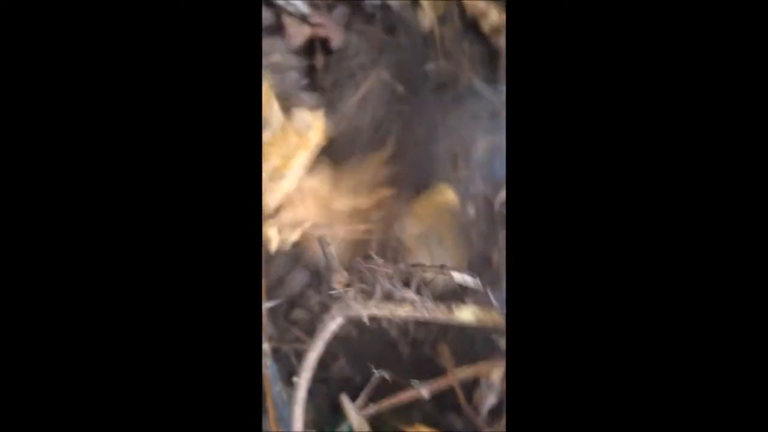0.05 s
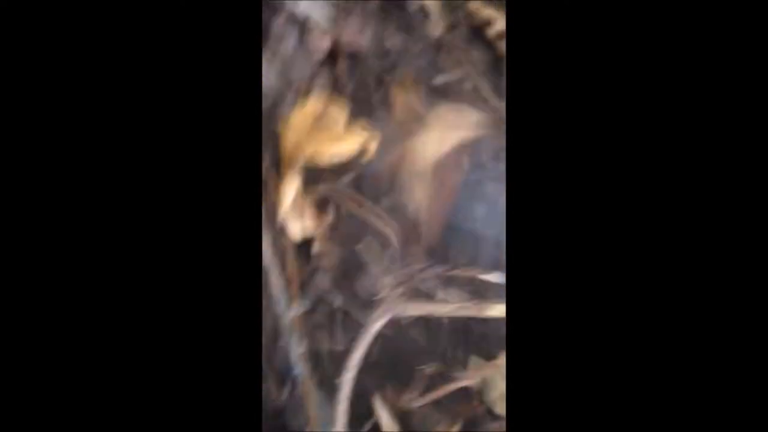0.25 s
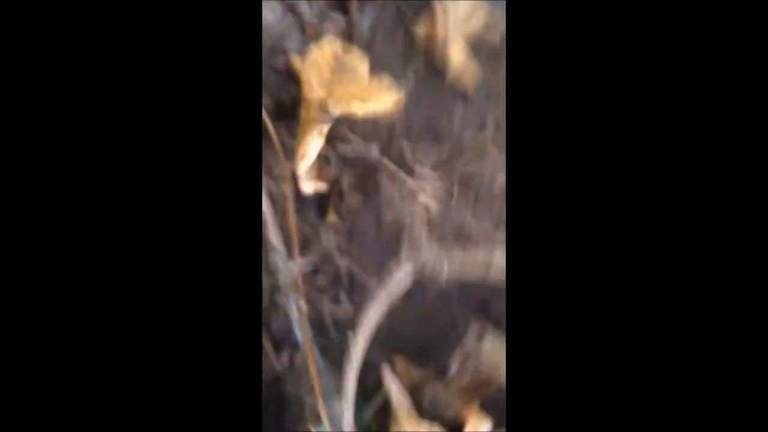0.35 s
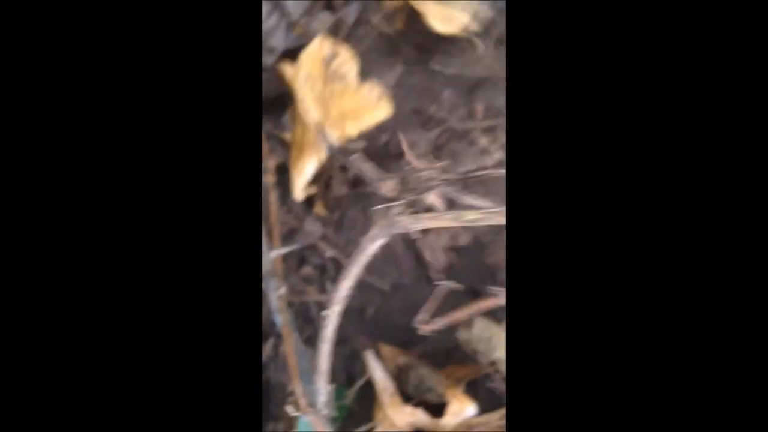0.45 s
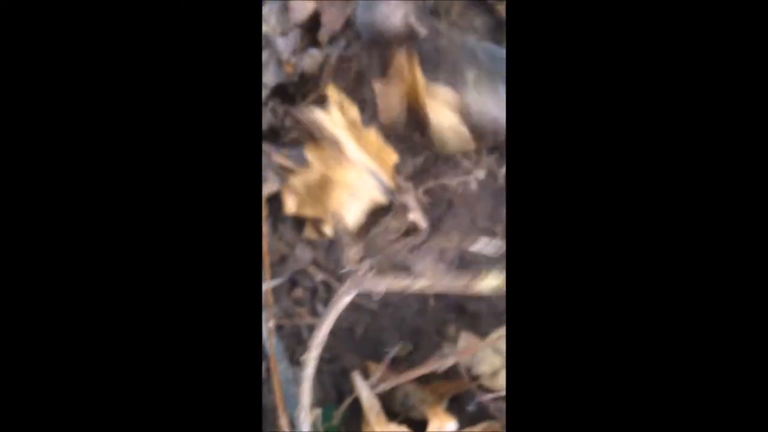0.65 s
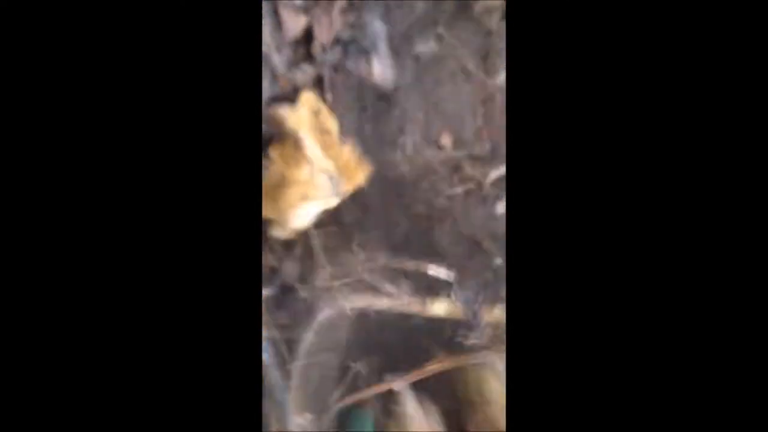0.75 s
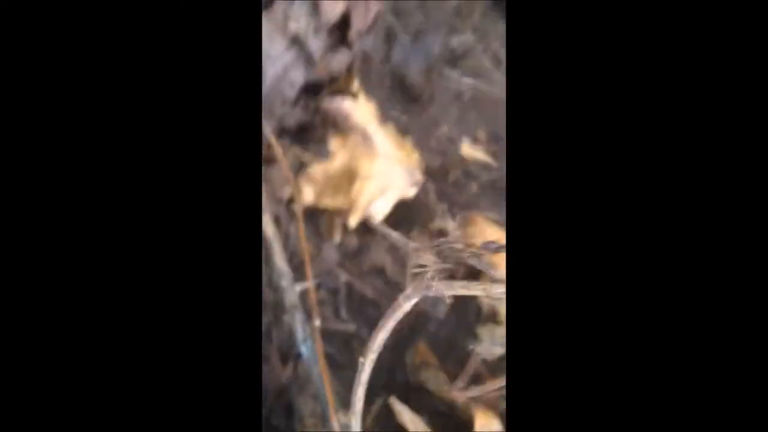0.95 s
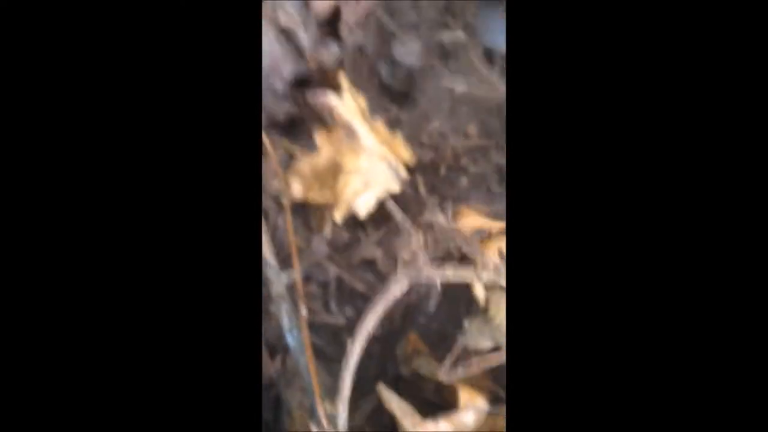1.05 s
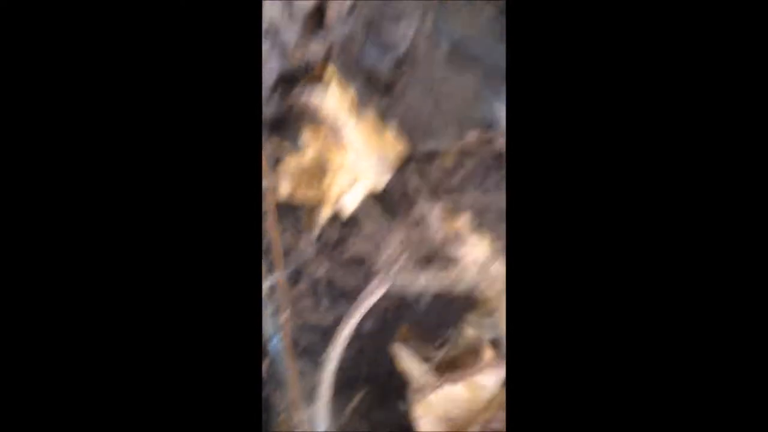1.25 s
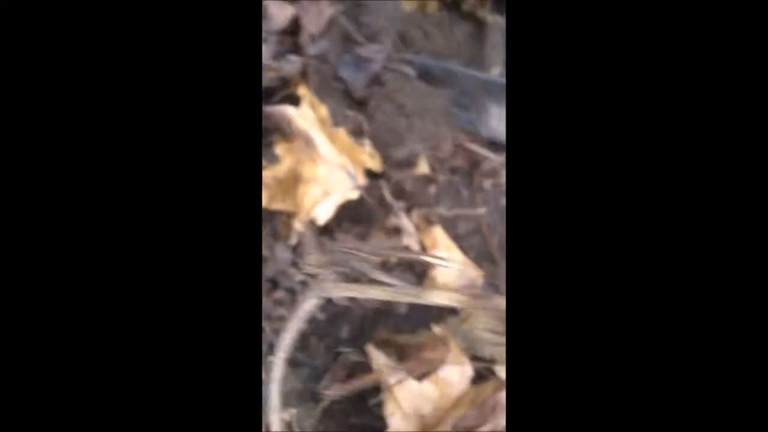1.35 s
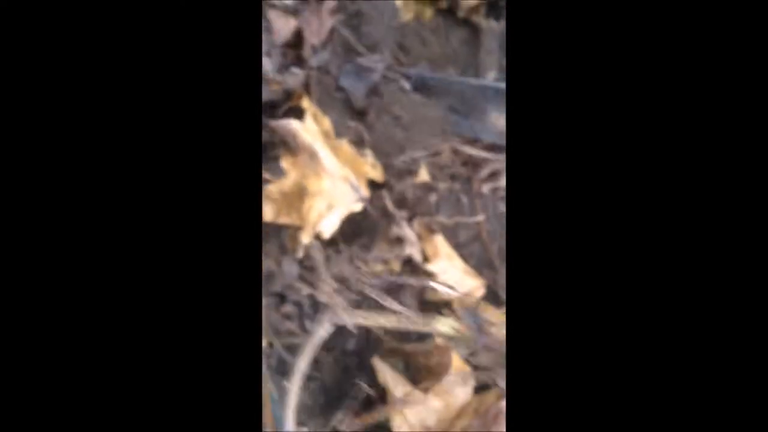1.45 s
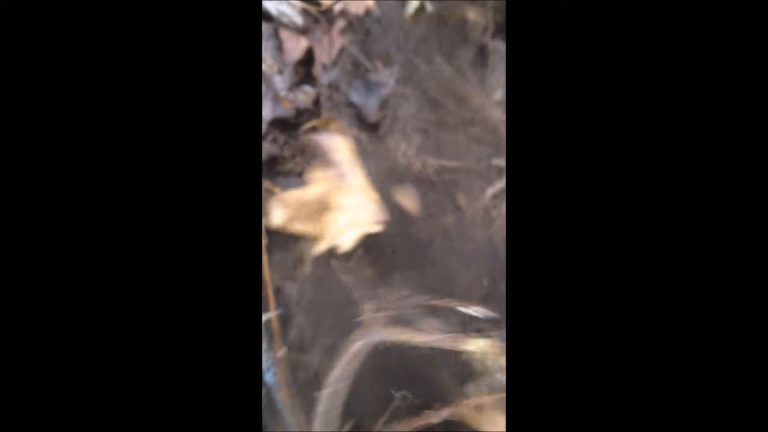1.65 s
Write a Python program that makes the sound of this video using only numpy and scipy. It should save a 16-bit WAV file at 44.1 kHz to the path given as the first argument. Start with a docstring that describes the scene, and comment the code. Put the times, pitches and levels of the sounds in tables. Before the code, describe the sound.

Digging in dry leaves: two bursts of sharp crackle, twig snaps and dull ground thuds

```python
"""Digging in leaf litter

A hand digging tool strikes leaf litter and rooty soil in short strokes, close to a small microphone.
Blows into the ground are damped low swings; twigs snap as a pulse with a dying burst of noise.
Leaves crackle and soil crunches as dense showers of tiny rings over noise.
A dull, lumpy low-mid rumble of sparse impulses comes and goes.
A low outdoor rumble and faint hiss, made of coloured noise, lie underneath."""
import sys
import numpy as np
from scipy import signal
from scipy.fft import rfft, irfft
from scipy.io import wavfile
from scipy.ndimage import uniform_filter1d

SR = 44100
rng = np.random.default_rng(int(sys.argv[2]) if len(sys.argv) > 2 else 0)


def pcm_store(signal):
    """Save signal as 16-bit PCM."""
    levels = np.round(np.clip(np.atleast_2d(signal), -1, 1) * 32767)
    wavfile.write(sys.argv[1], SR, levels.astype(np.int16).T)


N = 74970  # length in samples


def amp(db):
    """Decibels are logarithmic: 20 dB is a factor of ten in amplitude."""
    return 10 ** (np.asarray(db) / 20)


def evened(x):
    """Normalisation of power: the signal is brought to unit RMS."""
    return x / np.sqrt(np.mean(x ** 2) + 1e-20)


def add(mix, start_s, sound):
    """Superposition: a sound is summed into the mix at its start, cut at the end."""
    part = mix[round(start_s * SR):][:len(sound)]
    part += sound[:len(part)]


def coloured(x, points):
    """Spectral shaping: a gain over log frequency, 30 dB down an octave outside the table; unit RMS."""
    f, db = np.transpose(points)
    hz = np.fft.rfftfreq(N, 1 / SR) + 1  # 1 Hz up, so that the logarithm exists
    knots_hz = np.r_[f[0] / 2, f, f[-1] * 2]
    knots_db = np.r_[db[0] - 30, db, db[-1] - 30]
    gain_db = np.interp(np.log(hz), np.log(knots_hz), knots_db)
    return evened(irfft(rfft(x) * amp(gain_db), N))


def wander(samples):
    """Low-pass random process: noise averaged twice drifts slowly, at unit RMS."""
    once = uniform_filter1d(rng.standard_normal(N), samples)
    return evened(uniform_filter1d(once, samples))


def air():
    """Stationary coloured noise: low outdoor rumble and faint hiss, gently swelling."""
    # spectrum of the outdoor air: frequency_hz, relative_density_db (per Hz)
    air_spectrum = [(24, -100), (40, 2), (139, -1.5), (325, -21), (461, -22), (1190, -16), (1600, -21.5),
                    (1960, -55), (15500, -40)]
    level_db, swell_db = -58, 0.8
    swelling = amp(level_db + swell_db * wander(samples=1500))
    return swelling * coloured(rng.standard_normal(N), air_spectrum)


def low_mid_rumble():
    """Shot noise: sparse random impulses, band-shaped, make a dull, lumpy rumble that comes and goes."""
    # level of the low-mid rumble: time_s, level_db
    rumble_levels = [(.06, -65.5), (.1, -60), (.16, -64.5), (.36, -60), (.42, -97), (.66, -73),
                     (.79, -58.5), (.97, -75), (1.55, -80), (1.67, -60)]
    # spectrum of the low-mid rumble: frequency_hz, relative_density_db (per Hz)
    rumble_spectrum = [(230, -2), (420, -1), (750, -18.5)]
    lumps_per_s = 1200
    time_s, level_db = np.transpose(rumble_levels)
    lumps = rng.standard_normal(N) * (rng.random(N) < lumps_per_s / SR)
    envelope = amp(np.interp(np.arange(N) / SR, time_s, level_db))
    return envelope * coloured(lumps, rumble_spectrum)


def thuds():
    """Damped oscillation: the ground gives way at once under the blade and rebounds."""
    # blows into the ground: start_s, level_db (of the swing before damping), pitch_hz, fade_s (to 1/e)
    blows = [(0.0405, -23, 353, 0.0004), (0.199, -34.5, 291, 0.0043), (0.2103, -24, 175, 0.0052),
             (0.8257, -7.5, 222, 0.00046), (0.831, -19, 152, 0.0036), (0.8806, -29, 153, 0.0044),
             (.891, -19, 375, 0.00055), (0.9051, -27.5, 118, 0.0049), (1.4246, -38.5, 264, 0.0027),
             (1.6601, -44, 239, 0.003)]
    out = np.zeros(N)
    t = np.arange(4000) / SR
    for start_s, level_db, pitch_hz, fade_s in blows:
        swing = np.exp(-t / fade_s) * np.sin(2 * np.pi * pitch_hz * t)
        add(out, start_s, -amp(level_db) * swing)  # negative: the ground first gives way
    return out


def snaps():
    """Impulse excitation of a band: a sharp crack and a dying burst of noise, gathered around a pitch."""
    # single snaps of twigs and leaf stalks: crack_s, peak_db, pitch_hz, ring_t60_s (60 dB decay)
    snap_events = [(0.0404, -30, 2450, 0.0018), (0.0636, -33, 4600, 0.0017), (0.207, -33, 2280, 0.053),
                   (0.224, -33, 11400, 0.0062), (0.2265, -16.5, 4860, 0.059), (0.2842, -21, 11000, 0.0035),
                   (.321, -6, 11200, 0.0053), (0.3632, -7, 13900, 0.02), (.437, -31, 2640, 0.055),
                   (.4505, -19, 6800, 0.0026), (0.5805, -23, 9200, 0.0072), (0.605, -13, 11800, 0.0052),
                   (0.6255, -14, 8060, 0.0017), (0.636, -21, 5900, 0.0015), (0.657, -24, 8500, 0.0068),
                   (0.737, -28, 10300, 0.014), (0.8263, -29, 2800, 0.01), (0.84, -17, 11900, 0.0044),
                   (0.8418, -10, 6930, 0.019), (0.863, -15, 7000, 0.038), (.908, -11.5, 6500, 0.013),
                   (0.9755, -43, 9000, 0.0047), (1.148, -39, 1080, 0.0073), (1.2309, -26, 11500, .006),
                   (1.237, -47, 1520, 0.013), (1.2572, -35.5, 4500, 0.096), (1.266, -28.5, 7750, 0.035),
                   (1.312, -31, 7800, 0.024), (1.5168, -44, 1150, 0.0081), (1.660, -35, 3500, 0.003),
                   (1.694, -46, 2000, 0.022)]
    crack, lead = 5.5, 24  # pulse height against the noise's initial RMS; samples kept before the pulse
    width, width_t60_s = 0.6, 0.012  # spread in natural-log frequency, at this ring time
    out = np.zeros(N)
    n = np.arange(1024) - lead
    f = np.fft.rfftfreq(1024, 1 / SR) + 1
    noises = rng.standard_normal((len(snap_events), 1024))
    for (crack_s, peak_db, pitch_hz, t60_s), noise in zip(snap_events, noises):
        dying_noise = (n > 0) * amp(-60 * n / SR / t60_s) * noise
        drive = dying_noise - crack * (n == 0)
        spread = width * np.cbrt(width_t60_s / t60_s)  # short snaps spread wider
        band = np.exp(-(np.log(f / pitch_hz) / spread) ** 2)
        burst = irfft(rfft(drive) * band)
        add(out, crack_s - lead / SR, amp(peak_db) * burst / abs(burst).max())
    return out


def grains(per_s, spread_db, lo_hz, hi_hz, count=24):
    """Random damped resonances: tiny fractures ring at their own pitch, a few much larger, over a rustle."""
    ring_cycles = 4.25  # cycles until a ring falls to 1/e
    rustle_share = 0.5  # share of the power that is plain noise
    clump_db = 1.2  # RMS of the level's drift
    size_db = spread_db * np.minimum(rng.exponential(1, N), 4)
    size = amp(size_db) * (rng.random(N) < per_s / SR)
    kind = rng.integers(0, count, N)
    t = np.arange(600) / SR
    fractures = np.zeros(N)
    for k, hz in enumerate(np.geomspace(lo_hz, hi_hz, count)):
        ring = np.exp(-t * hz / ring_cycles) * np.sin(2 * np.pi * hz * t)
        fractures += signal.oaconvolve(size * (kind == k), ring * hz / hi_hz)[:N]
    rustle = rng.standard_normal(N)
    mix = np.sqrt(1 - rustle_share) * evened(fractures) + np.sqrt(rustle_share) * rustle
    return mix * amp(clump_db * wander(90))


def patchy(x):
    """Time-varying filtering: different bits of litter take turns, so the colour drifts in short patches."""
    patch_db = 1.85  # RMS of the gain over time and frequency
    z = signal.stft(x, nperseg=512, noverlap=384)[2]
    field = uniform_filter1d(rng.standard_normal(z.shape), size=12, axis=0)  # across frequency
    field = uniform_filter1d(field, size=6, axis=1)  # across time
    return evened(signal.istft(z * amp(patch_db * evened(field)), nperseg=512, noverlap=384)[1][:N])


def litter():
    """Addition of powers: stirring and collapses sum as energies that drive leaf crackle and soil crunch."""
    # stirring by the strokes: time_s, leaf_db, soil_db (against leaf), treble_db (change in the leaves' top)
    stirring = [(0, -58.5, -6, -4), (.05, -50, -13, -7), (0.124, -53, -16, -6.5), (.14, -66.5, -25, -4),
                (0.196, -58.5, -4.5, -8), (0.222, -30.5, -11.5, -0.5), (.33, -33, -21, 1),
                (.43, -39.5, -13, 1.5), (.51, -46.5, -23, -8), (0.569, -49.5, -7, 0.5),
                (0.583, -33.5, -17, -0.5), (0.689, -50, -14.5, 1.5), (0.815, -46.5, -18.5, -5),
                (0.832, -29, -13, 2.5), (.92, -32, -18.5, -2), (1.021, -42.5, -25, 0.5),
                (1.19, -60.5, -7.5, 2), (1.24, -53, -13.5, 1), (1.379, -50.5, -11, -7),
                (1.5, -62.5, -6.5, -11), (1.641, -57.5, -8, -8.5), (1.7, -44.5, -13.5, -4)]
    # collapse of leaves and clods: full_s (full level reached), leaf_db, soil_db (against leaf),
    # hold_s, fall_db_per_s
    collapses = [(0.102, -43.5, -11, 0.0054, 900), (0.221, -24.5, -14.5, 0.0056, 603),
                 (0.262, -31.5, -13.5, 0.025, 600), (0.358, -29.5, -9.5, 0.0071, 2000),
                 (0.396, -38.5, -15.5, 0.019, 700), (0.477, -36.5, -15.5, 0.011, 2000),
                 (0.577, -31.5, -19, 0.015, 800), (0.654, -39, -39, 0.0082, 996),
                 (0.836, -26.5, -19, 0.005, 600), (0.888, -25, -11, 0.015, 608),
                 (0.97, -26.5, -15.5, 0.0046, 491), (1.032, -45, -15, 0.0087, 495),
                 (1.226, -50.5, -7, 0.0098, 800), (1.254, -44, -9, 0.011, 2000)]
    # spectrum of the leaf crackle: frequency_hz, relative_density_db (per Hz)
    leaf_spectrum = [(1500, -11.5), (2500, -10), (4140, -4), (4850, -5), (5670, -1), (7380, -3), (13100, 0),
                     (15400, 1)]
    # spectrum of the soil crunch: frequency_hz, relative_density_db (per Hz)
    soil_spectrum = [(300, -6), (500, -3), (900, 1), (1900, 1.5), (2800, -2), (4000, -2)]
    rise_db_per_s, treble_hz = 4000, 9000
    time_s, leaf_db, soil_db, treble_db = np.transpose(stirring)
    t = np.arange(N) / SR
    # twice the decibels as an amplitude is a power
    leaf_power = amp(2 * np.interp(t, time_s, leaf_db))
    soil_power = amp(2 * np.interp(t, time_s, leaf_db + soil_db))
    for full_s, crackle_db, crunch_db, hold_s, fall_db_per_s in collapses:
        rise_db = np.minimum(rise_db_per_s * (t - full_s), 0)
        shape_db = np.minimum(rise_db, fall_db_per_s * (full_s + hold_s - t))
        leaf_power += amp(2 * (crackle_db + shape_db))
        soil_power += amp(2 * (crackle_db + crunch_db + shape_db))

    leaves = patchy(coloured(grains(6000, 3.2, 1893, 14220), leaf_spectrum))
    treble = signal.filtfilt(*signal.butter(2, treble_hz, "high", fs=SR), leaves)
    leaves = leaves + (amp(np.interp(t, time_s, treble_db)) - 1) * treble
    soil = coloured(grains(3000, 3.1, 286.8, 3640), soil_spectrum)
    return np.sqrt(leaf_power) * leaves + np.sqrt(soil_power) * soil


def scene():
    """Linear superposition: all sources sum at one microphone."""
    return (air() + low_mid_rumble() + thuds() + snaps() + litter())[None]


def record(dry):
    """Band limitation: the small microphone loses the deepest bass, the recorder the highest treble."""
    mic_low_hz, edge_hz = 52.4, 15400
    thin = signal.lfilter(*signal.butter(3, mic_low_hz, "high", fs=SR), dry)
    low_pass = signal.firwin(511, edge_hz, window=("kaiser", 9), fs=SR)
    return signal.oaconvolve(thin, low_pass[None], "same")


dry = scene()
out = record(dry)
pcm_store(out)
```